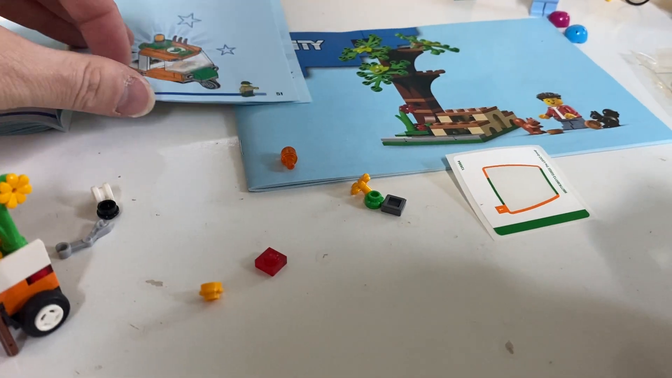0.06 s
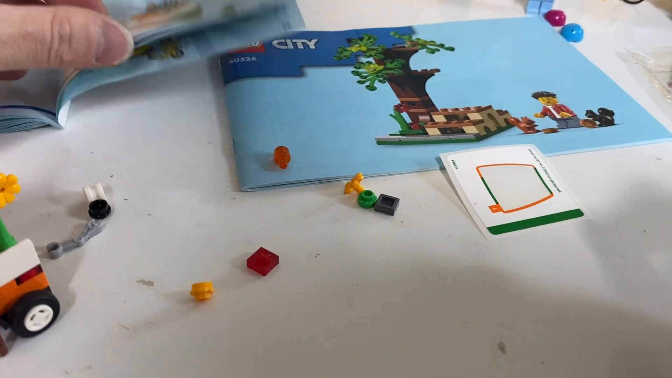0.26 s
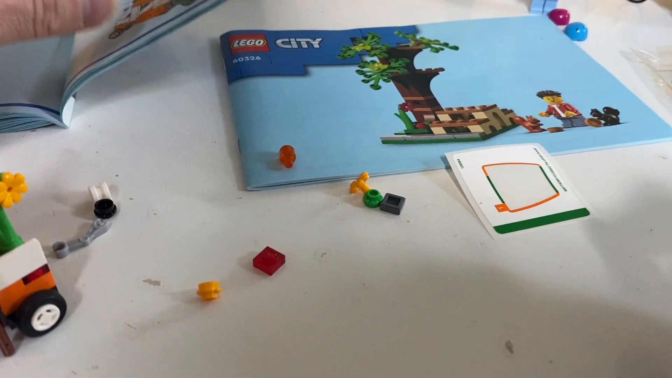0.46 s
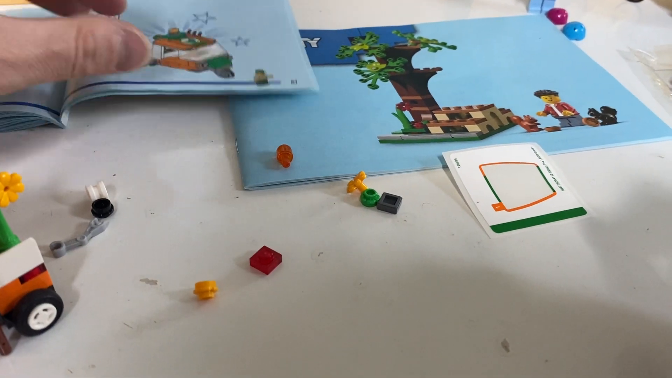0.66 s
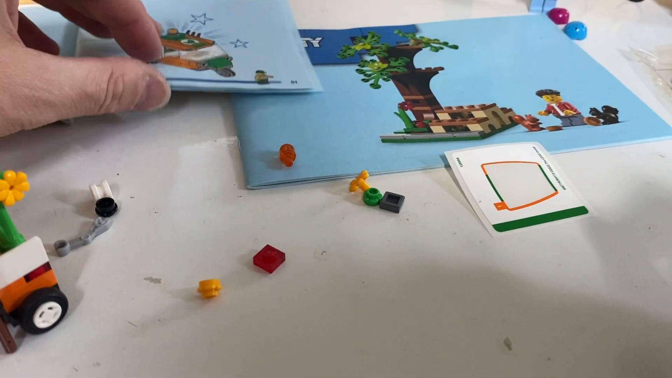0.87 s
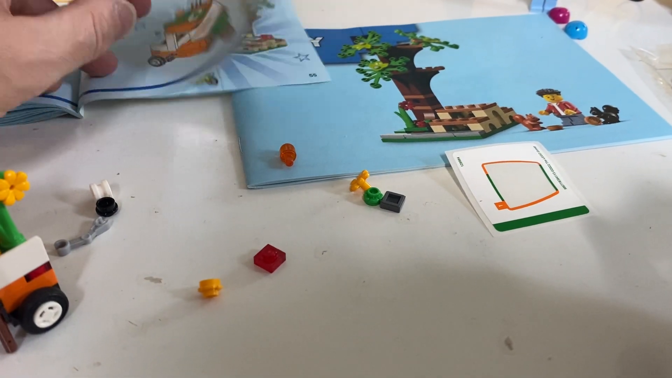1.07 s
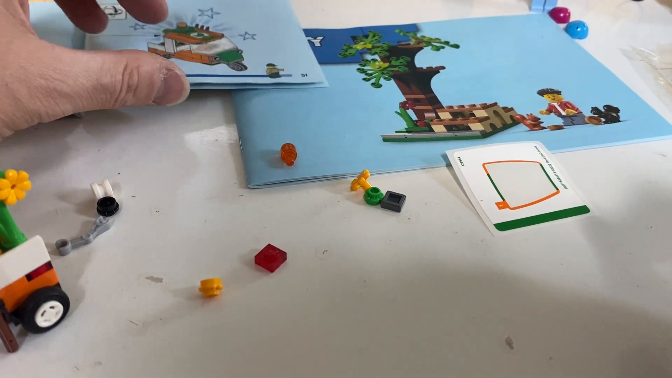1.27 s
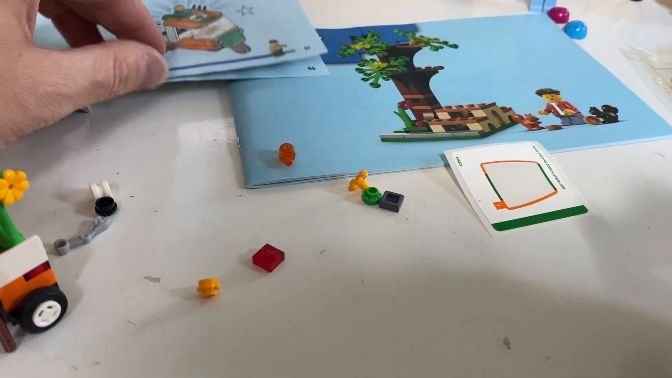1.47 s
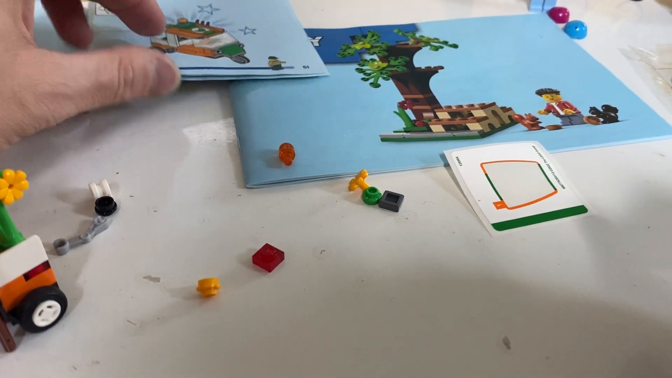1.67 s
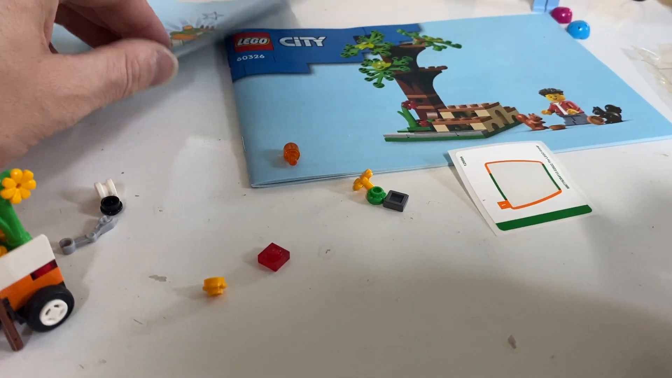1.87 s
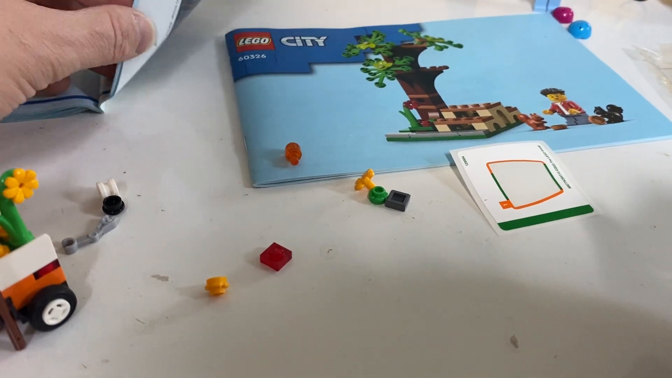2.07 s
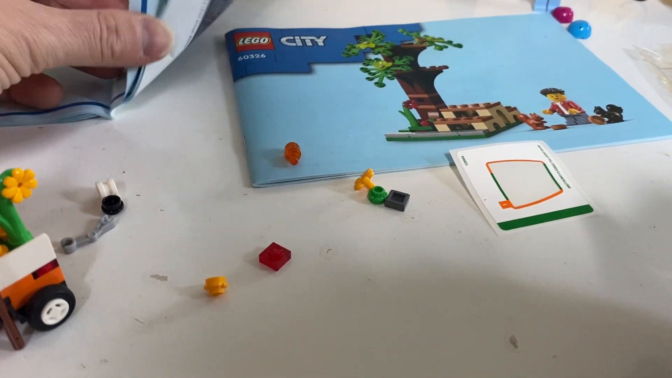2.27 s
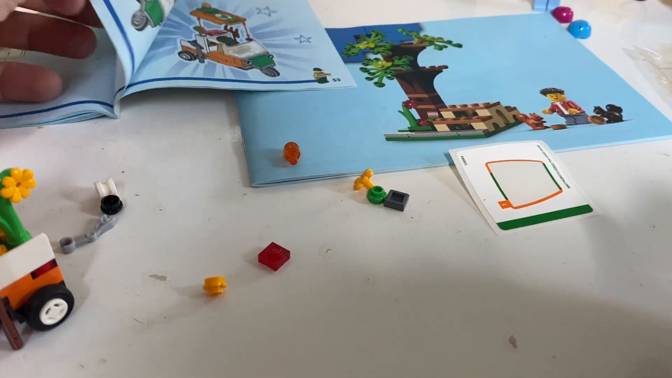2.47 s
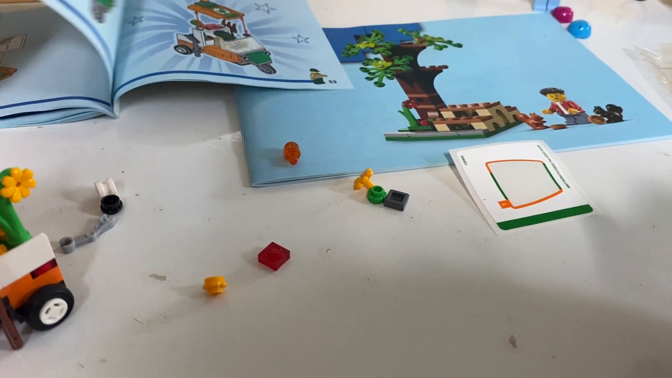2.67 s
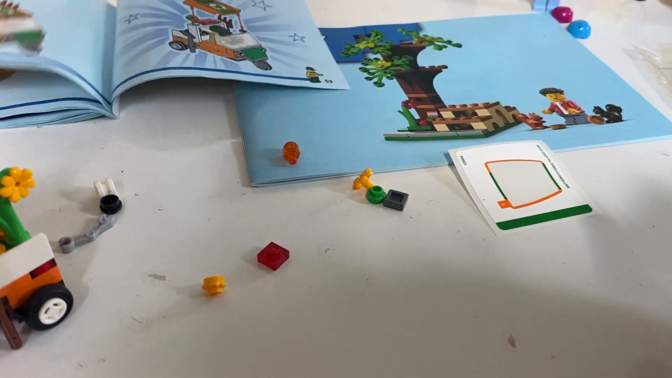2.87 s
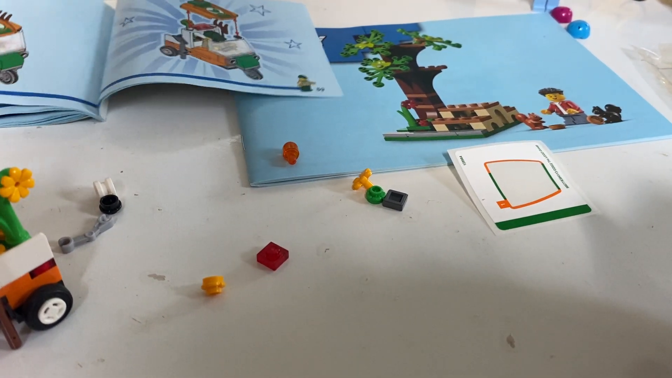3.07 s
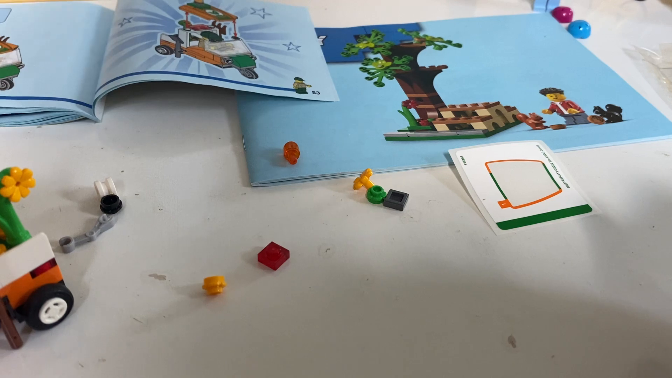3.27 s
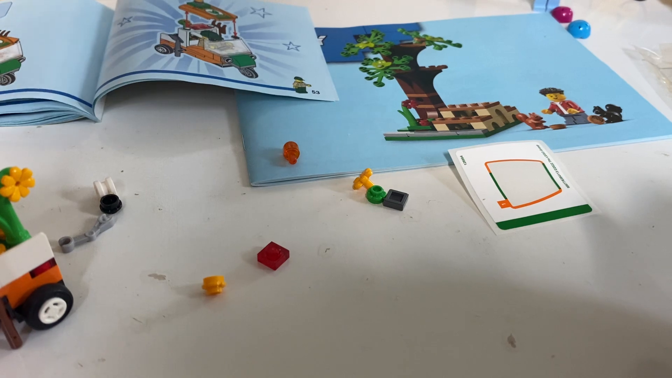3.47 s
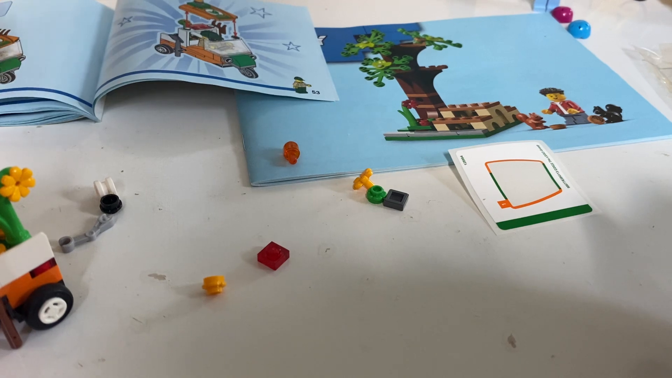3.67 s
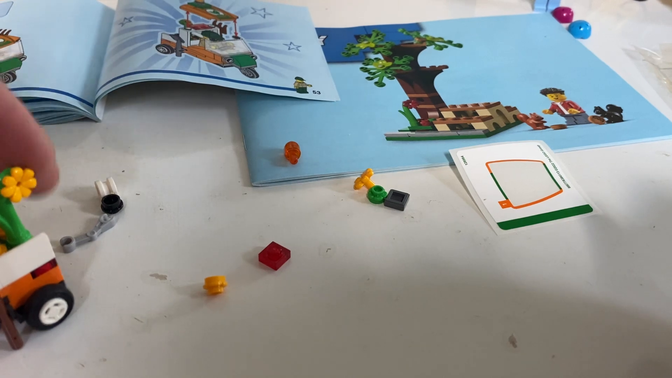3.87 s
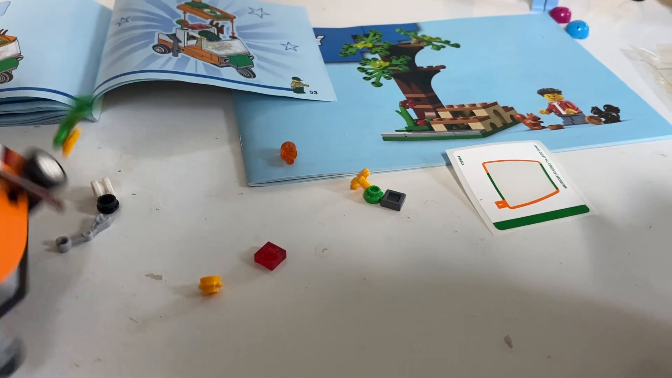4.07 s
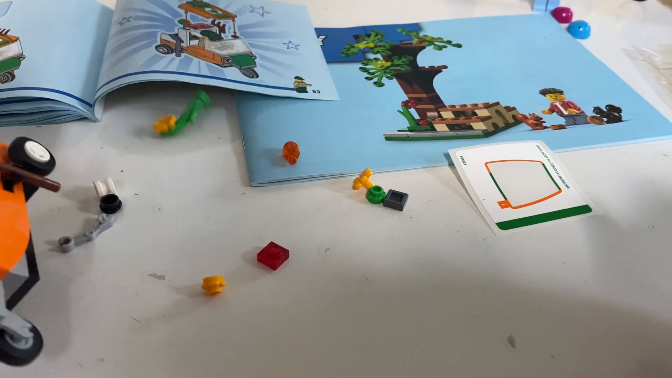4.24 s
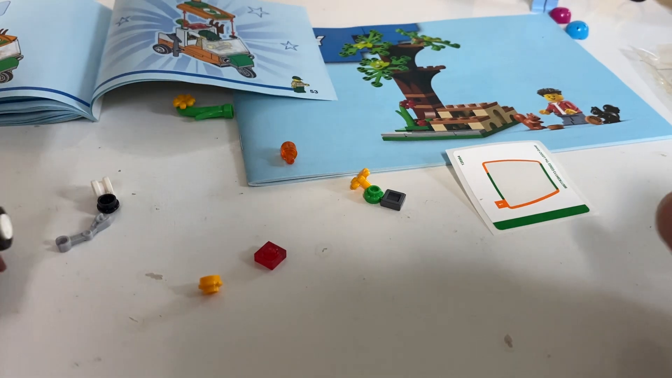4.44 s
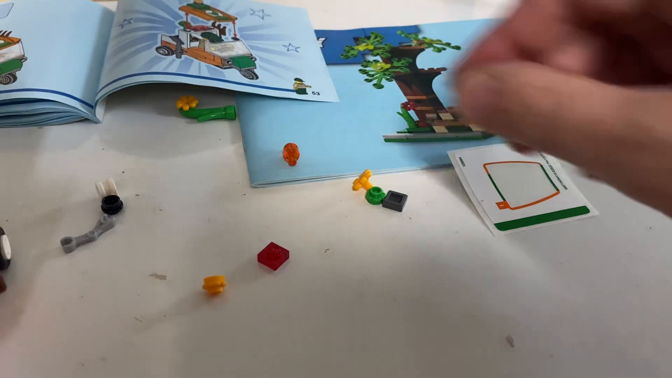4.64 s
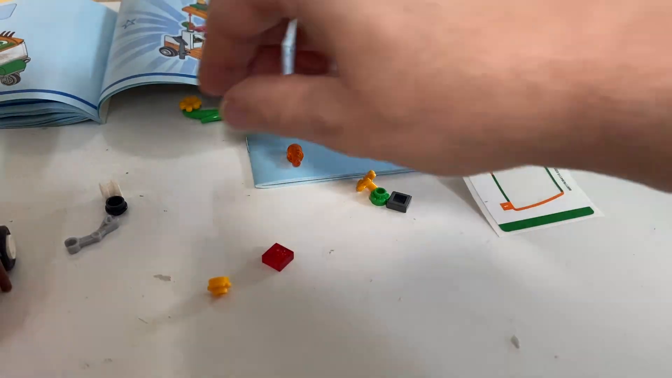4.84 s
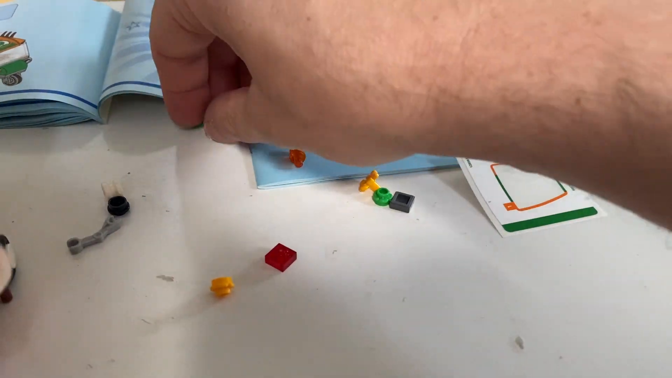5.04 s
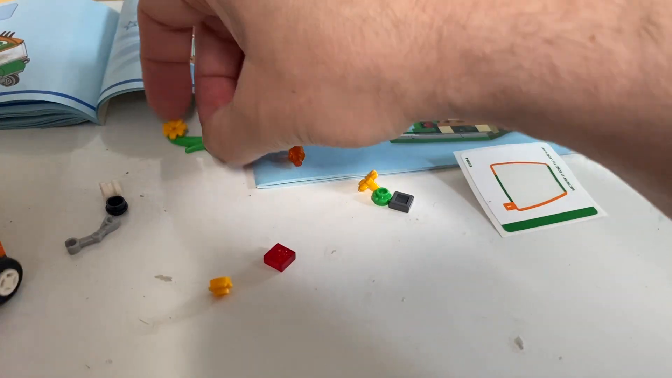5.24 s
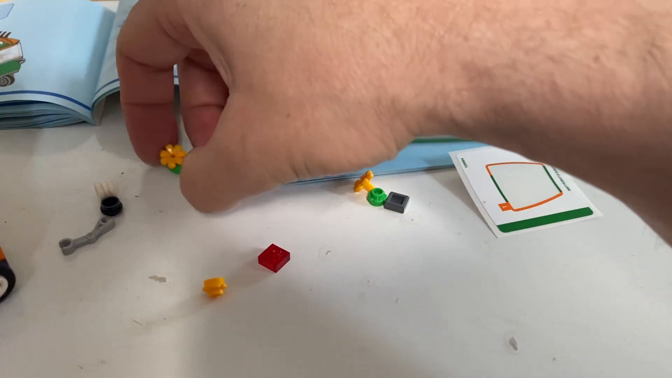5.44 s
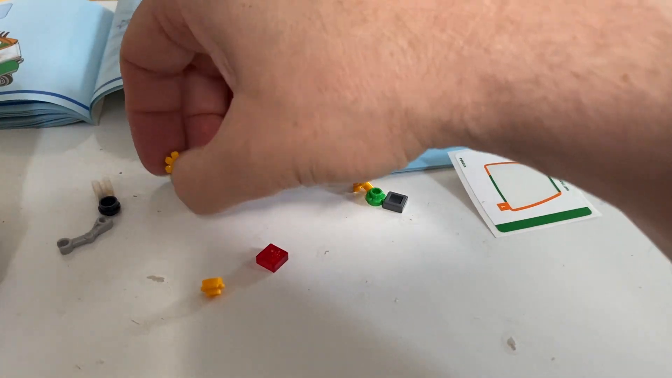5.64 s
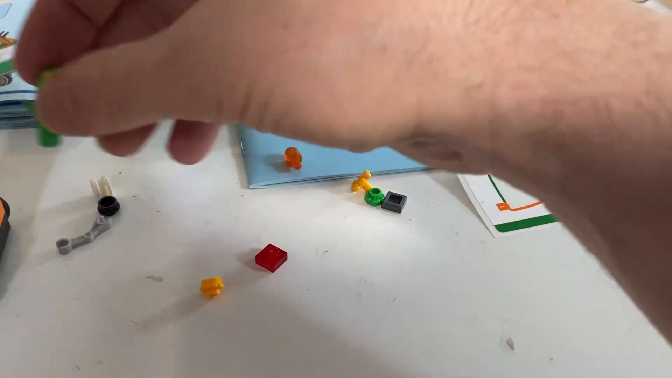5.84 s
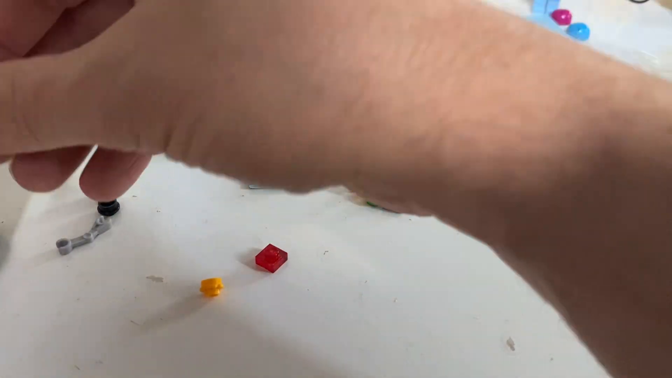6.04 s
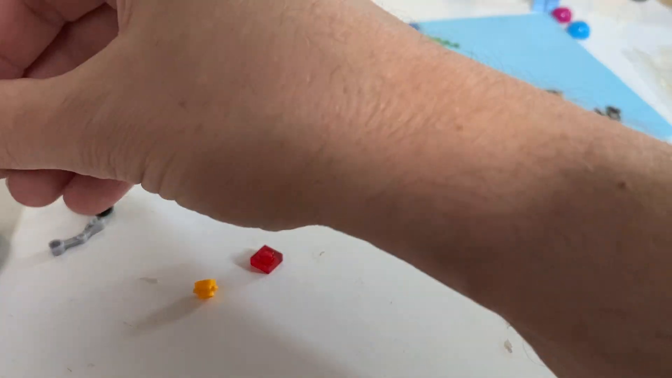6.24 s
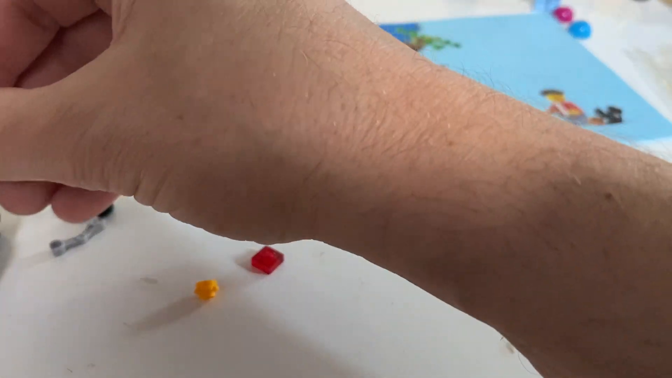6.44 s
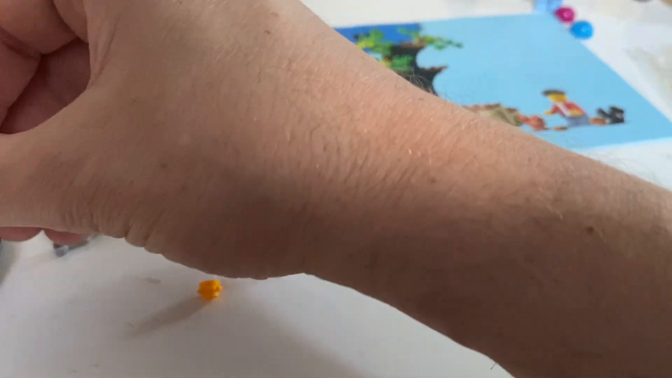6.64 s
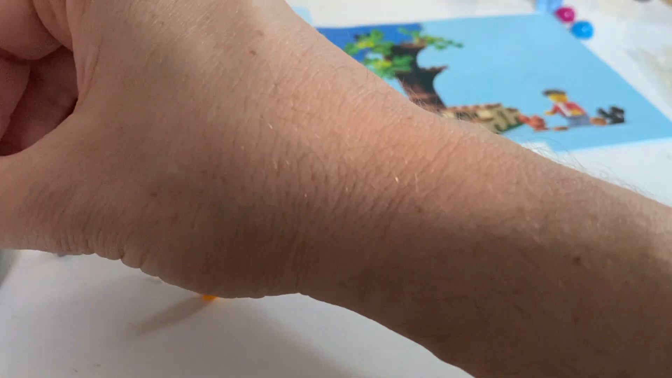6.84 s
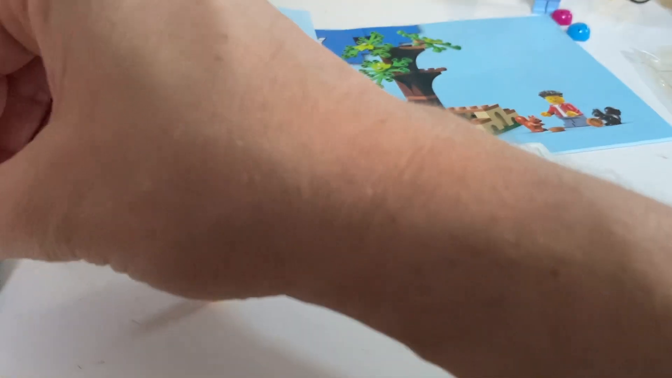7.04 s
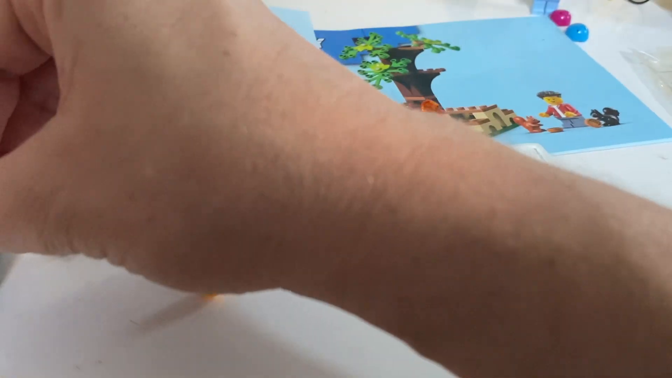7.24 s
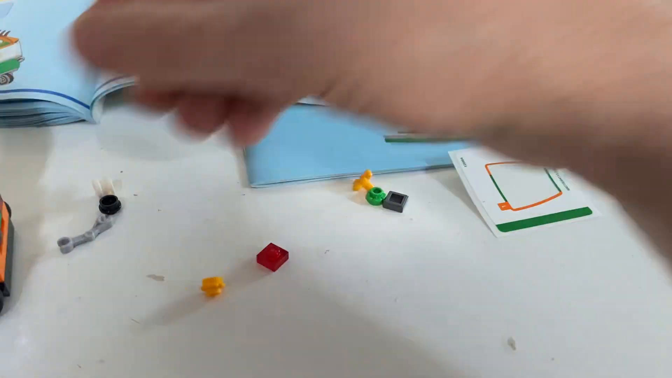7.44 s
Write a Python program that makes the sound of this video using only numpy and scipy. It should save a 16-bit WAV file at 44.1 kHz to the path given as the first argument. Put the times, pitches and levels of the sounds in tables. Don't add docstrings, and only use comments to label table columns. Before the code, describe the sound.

Faint paper sliding and thin snaps of a booklet being leafed through swell into a brisk page turn, then fade. A sudden hard double crack of plastic follows, with a hollow hit and rapid rattling bounces on the tabletop. Afterwards come quiet finger touches, a brief stuttering scrape, a click and a few muted knocks. Close, wide stereo, low room hush.

```python
import sys
import numpy as np
from scipy import signal
from scipy.fft import rfft, irfft, next_fast_len
from scipy.io import wavfile
from scipy.ndimage import map_coordinates

SR = 44100
rng = np.random.default_rng(int(sys.argv[2]) if len(sys.argv) > 2 else 0)


def materialize(psi):
    bounded = np.clip(np.atleast_2d(psi).T, -1, 1)
    quanta = np.round(bounded * 32767).astype(np.int16)
    wavfile.write(sys.argv[1], SR, quanta)


def volts_from_decibels(level):
    exponent = np.asarray(level, float) / 20
    return 10 ** exponent


N = 330880


def unit(x):
    return x / np.sqrt(np.mean(x ** 2) + 1e-20)


def peak(x):
    return x / np.abs(x).max(axis=1, keepdims=True)


def along(points, hz):
    f, v = np.transpose(points)
    return np.interp(np.log(hz + 1), np.log(f + 1), v)


def wobble(rate):
    return map_coordinates(rng.standard_normal(int(N * rate / SR) + 4), [np.arange(N) * rate / SR])


def filtered(x, response):
    n = x.shape[-1]
    m = next_fast_len(n + 4096)
    return irfft(rfft(x, m) * response(np.fft.rfftfreq(m, 1 / SR)), m)[..., :n]


def resonance(f, hz, width):
    return 1j * f * width / (hz ** 2 - f ** 2 + 1j * f * width)


def modes(table):
    return lambda f: sum((-1) ** k * volts_from_decibels(db) * resonance(f, hz, width)
                         for k, (hz, width, db) in enumerate(table))


def band(x, lo_hz, hi_hz):
    sos = signal.butter(2, [lo_hz, min(hi_hz, SR / 2.2)], "band", fs=SR, output="sos")
    return signal.sosfilt(sos, x)


def add_at(start_s, sounds):
    at = np.round(start_s * SR).astype(int) + np.arange(sounds.shape[1])
    return np.bincount(at.ravel(), sounds.ravel(), N + SR)[:N]


# pitch_hz, level_db
HUSH_COLOUR = [(100, -3), (250, -5), (500, -11), (1000, -25), (2000, -32.5), (4000, -38.5), (8000, -37.5),
               (15000, -41)]
# pitch_hz, level_db
RUMBLE_COLOUR = [(15, -53), (28, -23), (48, -1.5), (70, -1), (124, -9.5), (250, -16), (320, -45.5),
                 (550, -120)]
# time_s, level_db
RUMBLE_LEVEL = [(0.0, -57.5), (1.02, -51), (2.28, -60), (2.34, -46), (2.44, -60.5), (3.84, -66),
                (3.99, -42), (4.03, -46), (4.41, -66), (4.45, -51), (4.66, -52.5), (5.3, -52), (6.45, -61),
                (6.6, -53.5), (6.73, -65.5), (6.77, -43), (6.93, -56), (7.5, -58.5)]


def stillness():
    hush = filtered(rng.standard_normal((2, N)), lambda hz: volts_from_decibels(along(HUSH_COLOUR, hz)) * (hz > 100))
    rumble = filtered(rng.standard_normal((2, N)), lambda hz: volts_from_decibels(along(RUMBLE_COLOUR, hz)))
    rumble_db = np.interp(np.arange(N) / SR, *np.transpose(RUMBLE_LEVEL)) + 2.5 * wobble(6)
    return volts_from_decibels(-69.5) * unit(hush) * [[1], [1.6]] + volts_from_decibels(rumble_db) * unit(rumble)


def strokes(rows, release_db_per_s, body_db, air_db, dulls, linger):
    t = np.arange(0, N + 32, 32) / SR
    power = 0
    for start_s, length_s, first_db, last_db, bright_db in rows:
        held = first_db + (last_db - first_db) * np.clip((t - start_s) / length_s, 0, 1)
        held = held - 1097.5 * np.maximum(start_s - t, 0)
        fall = release_db_per_s * np.maximum(t - start_s - length_s, 0)
        hiss = held - fall
        body = held + body_db - dulls * bright_db - fall / linger
        air = held + air_db + bright_db - fall
        power = power + volts_from_decibels([hiss, body, air]) ** 2
    return np.repeat(np.sqrt(power), 32, axis=1)[:, :N]


# pitch_hz, width_hz, level_db
SHEET = [(1040, 1500, -4.5), (1400, 300, 2.5), (2700, 390, 2), (3687, 1500, -2), (4750, 2100, 1),
         (7300, 6600, -8)]
# pitch_hz, width_hz, level_db
TABLE_TOP = [(104, 44, -7.5), (206.5, 15, -2), (307, 60, -9.5)]
# start_s, length_s, first_db, last_db, brightness_db
PAPER_STROKES = [(0, .16, -67.5, -69.5, 5), (.17, 0.095, -71.5, -64, 2), (.3, 0.19, -64, -99, -6),
                 (.865, 0.18, -67, -55, 0), (1.04, 0.16, -65.5, -75, -6), (1.395, 0.062, -69.5, -53.5, 1.5),
                 (1.48, 0.24, -64.5, -92.5, 1.5), (1.7, 0.14, -79.5, -64.5, -7),
                 (1.82, 0.37, -57, -61.5, 1), (1.98, 0.35, -74, -62, -10.5), (2.1, .24, -56, -43.5, 3.5),
                 (2.36, 0.086, -46.5, -61, 0), (2.465, 0.08, -58.5, -47.5, 4.5),
                 (2.56, 0.103, -65, -68.5, 5), (2.68, 0.11, -57.5, -62, 3), (2.8, 0.13, -56.5, -61, -2),
                 (2.93, 0.23, -62.5, -65.5, 4.5), (3.17, 0.091, -83, -80, -3),
                 (3.295, 0.076, -65.5, -66, 5.5), (3.36, 0.11, -61.5, -74.5, -1.5)]
# start_s, length_s, first_db, last_db, brightness_db
HAND_STROKES = [(3.878, 0.031, -62, -56, 6), (3.985, 0.03, -40, -75, 2), (4.08, 0.074, -58.5, -55, -6),
                (4.17, 0.24, -45.5, -48.5, 0), (4.42, 0.1, -68, -54.5, -1), (4.55, 0.26, -59, -93, -3.5),
                (4.8, 0.061, -84, -87.5, -31.5), (4.9, 0.15, -66, -55.5, 2.5), (5.02, 0.13, -67, -53, 0.5),
                (5.218, 0.053, -38, -38.5, 3.5), (5.39, 0.018, -57, -45.5, -3.5),
                (5.43, 0.1, -50.5, -58, 0), (5.63, 0.068, -43.5, -58, -3), (5.74, 0.26, -71.5, -67, -6),
                (6.11, 0.071, -75, -73.5, -10), (6.175, 0.071, -67, -70.5, 0),
                (6.25, 0.032, -69.5, -62.5, -3), (6.45, 0.17, -63, -72.5, -3.5), (6.77, 0.13, -64, -61, -3),
                (6.93, 0.11, -64.5, -72.5, 1.5), (7.155, 0.13, -64, -70.5, 1.5),
                (7.27, 0.3, -65.5, -62.5, 1)]


def rubbing():
    paper = strokes(PAPER_STROKES, release_db_per_s=1092, body_db=-2.5, air_db=-4.5, dulls=1, linger=0.63)
    hands = strokes(HAND_STROKES, release_db_per_s=452.5, body_db=1, air_db=-11, dulls=0.55, linger=1.7)
    hiss_gain, body_gain, air_gain = paper + hands

    slipping = rng.random(N) < 300 * volts_from_decibels(7 * wobble(20)) / SR
    slips = unit(slipping * rng.standard_normal(N) * volts_from_decibels(2.2 * rng.standard_normal(N)))
    grip = wobble(90)

    def scrape(share):
        return rng.standard_normal(N) * volts_from_decibels(1.8 * grip + 1.5 * wobble(30)) + share * slips

    sheet = [volts_from_decibels(3.5 * wobble(12)) * filtered(scrape(0.6), modes([mode])) for mode in SHEET]
    hiss = unit(band(sum(sheet[2:]), 1584, 16000)) + 0.73 * unit(band(scrape(0.3), 1700, 6000))
    air = unit(band(scrape(0.59), 6300, 12000))
    body = unit(band(sum(sheet[:2]), 340, 1600)) + 1.4 * unit(band(scrape(0.87), 270, 1500))
    table = volts_from_decibels(-10 + 2.2 * wobble(7)) * unit(filtered(scrape(0.2), modes(TABLE_TOP)))
    direct = volts_from_decibels(-3.5) * hiss_gain * unit(hiss) + body_gain * unit(body)
    late = np.arange(N) - 0.00105 * SR * (1 + 0.05 * wobble(2))
    bounced = np.interp(late, np.arange(N), direct)
    return 0.81 * (direct + 0.44 * bounced) + air_gain * air + body_gain * table


# start_s, peak_db, pitch_hz, swell_ms
PUFFS = [(0.021, -52.5, 2170, 0.61), (.13, -53.5, 4000, 1.6), (0.327, -49, 1470, 1.6),
         (0.393, -64, 2200, 1.3), (.897, -52, 6000, 1), (0.951, -55, 2700, 1.8), (.991, -52, 2300, 1.7),
         (1.007, -52, 2700, 2), (1.014, -46, 2000, 2), (1.039, -55, 3700, 1.5), (1.046, -47, 4430, 2.6),
         (1.102, -35.5, 1700, 1.9), (1.13, -64, 2500, 8), (1.166, -52.5, 1680, 5.3), (1.386, -68, 3000, 2),
         (1.795, -57.5, 4500, 1.6), (2.17, -41, 1300, 3.4), (2.209, -44, 1600, 4),
         (2.237, -34.5, 1100, 1.5), (2.29, -43.5, 3900, 1.8), (2.484, -54, 1000, 1.8),
         (2.596, -51, 3900, 2.9), (2.696, -53, 2540, 2.3), (2.698, -44, 1140, 2.7),
         (2.742, -50.5, 905, 1.6), (2.783, -50.5, 3070, 3), (2.834, -44, 3500, 1.5),
         (2.836, -41.5, 1200, 1.9), (2.866, -40.5, 1330, 1.8), (3.012, -51, 1990, 1.4),
         (3.277, -59, 2240, 2.7), (3.306, -71, 2220, 3), (3.345, -49, 4800, 4.5),
         (3.959, -43, 3470, 4.2), (3.983, -23.5, 3800, 1.5), (3.997, -28.5, 3680, 5.5),
           (4.05, -25, 7300, 2.4), (4.05, -23, 3400, 1.5), (4.019, -26.5, 2800, 1.6),
           (3.968, -19.5, 11500, 1.1), (4.051, -36, 1300, 2), (4.152, -14, 804, 1.24),
           (4.1524, -10.5, 1310, 1), (4.2248, -20.5, 1320, 2), (4.434, -31.5, 533, 8.5),
           (4.414, -45.5, 3000, 2.2), (4.66, -42.5, 1114, 3.6), (4.941, -44, 2500, 3.3),
           (4.966, -38, 1400, 2.4), (5.005, -45.5, 1000, 3.7), (5.041, -45.5, 3620, 1.9),
           (5.042, -43.5, 795, 1.4), (5.0643, -53, 1900, 1.5), (5.113, -56, 1000, 2.7),
           (5.135, -53.5, 4800, 5), (5.2118, -24, 746, 1.04), (5.2302, -20.5, 790, 0.53),
           (5.253, -23.5, 680, .7), (5.184, -45.5, 2600, 1.7), (5.298, -50.5, 2200, 1.5),
           (5.314, -46, 2800, 3.2), (5.424, -38, 1520, 4.2), (5.462, -47.5, 2170, 1.5),
           (5.485, -49, 890, 8.4), (5.498, -51, 2500, 2.2), (5.566, -51, 5240, 2.9),
           (5.647, -36.5, 4300, 2), (5.65, -33.5, 798, 5), (5.685, -35.5, 1650, 4.1), (5.687, -45, 3240, 2),
           (5.746, -33.5, 927, 1.5), (6.83, -52, 5380, 3.3), (6.865, -53.5, 5070, 4.2),
           (7.047, -42, 714, 2.6), (7.336, -45, 713, 2.1)]


def touches():
    start_s, peak_db, hz, swell_ms = np.transpose(PUFFS)[:, :, None]
    u = np.arange(SR // 12) / SR / (swell_ms / 1000)
    noise = rng.standard_normal(u.shape) * u * np.exp(-u)
    puff = filtered(noise, lambda f: resonance(f, hz, 0.58 * hz) ** 2)
    return add_at(start_s, volts_from_decibels(peak_db) * peak(puff))


# pitch_hz, width_hz, level_db
TOY_BODY = [(800, 170, 0), (560, 150, -5), (1310, 180, -9), (1000, 160, -4), (400, 120, -8)]


def contacts(rows, crack_s, ring_s, body_s, table_s, ring_db, low_hz, edge_db):
    start_s, peak_db, hz, body_db, air_db, *table_db = np.transpose(rows)[:, :, None]
    t = np.arange(SR // 12) / SR
    chance = rng.standard_normal((len(rows), 4, len(t)))

    def dying(t60):
        return volts_from_decibels(-60 * t / t60) * (1 - np.exp(-t / 0.0013))

    hold = np.exp(-(t / crack_s) ** 4)
    chatter = chance[:, 0] * (hold + 0.16 * dying(6 * crack_s)) * (1 - np.exp(-t / 0.00035))
    edge = volts_from_decibels(np.minimum(edge_db + 0.4 * air_db, 3))
    crack = band(chatter, low_hz, 5000) + edge * band(chatter, 5400, 9400)
    crack = band(crack, low_hz, 9000)
    ring = filtered(chance[:, 3] * dying(ring_s), lambda f: resonance(f, hz, 0.13 * hz))
    air = band(chatter, 7000, 13800)
    body = filtered(chance[:, 1] * (dying(body_s) + 1.2 * hold), modes(TOY_BODY))
    body = band(body, 550, 2800)
    table = filtered(chance[:, 2] * dying(table_s), modes(TABLE_TOP))
    thud_db = table_db[0] if table_db else body_db - 4

    hit = peak(peak(crack) + volts_from_decibels(ring_db) * peak(ring))
    hit += volts_from_decibels(np.minimum(air_db + 7, 3)) * peak(air)
    hit += volts_from_decibels(body_db + 2) * peak(body)
    hit += volts_from_decibels(thud_db + 2) * peak(table)
    return add_at(start_s, volts_from_decibels(peak_db + 2.5) * hit)


# start_s, peak_db, pitch_hz,
# body_db, air_db (both relative)
SNAPS = [(0.167, -48, 1900, -36, 0), (0.2133, -50, 2250, -30, -1.5), (0.2382, -34.5, 3470, -18.5, -3.5),
         (0.2507, -47, 6230, -34, -20), (0.2678, -36, 6350, -29, -12), (0.2742, -33, 6170, -23.5, -25),
         (0.9517, -57, 2770, -8, -29), (1.025, -34, 6700, -16.5, -9.5), (1.0295, -39, 4030, -16.5, -9),
         (1.1046, -43.5, 4170, -3, -36), (1.4161, -31.5, 3940, -14, -15), (1.4535, -45, 6070, -13, -32),
         (1.718, -58, 2140, -5, -14), (1.8213, -45.5, 1740, -3.5, -3), (1.8959, -37.5, 2430, -10.5, -3),
         (2.063, -45, 6200, -20, -14), (2.296, -34.5, 1610, -17, -17), (2.3269, -29, 6000, -7, -21),
        (2.337, -26.5, 1710, -19, -14), (2.346, -35.5, 2270, -10.5, -24), (2.3723, -39, 3850, -7, -9),
        (2.4704, -44, 6850, -12, -14), (2.6878, -44, 3400, -9.5, -26), (2.794, -45, 2440, -23, -23),
        (2.8081, -46, 2230, -9, -12), (2.861, -35, 2600, -29, -18), (2.898, -48, 2200, -25, -25.5),
        (2.9174, -38.5, 5300, -19, -32.5), (2.9572, -59.5, 4850, 13.5, -14), (3.0599, -47, 2610, -3.5, -7),
        (3.352, -42.5, 6740, -31, -16), (3.4043, -48.5, 5030, -7, -27), (3.417, -45, 2470, -11.5, -33),
        (4.9484, -34.5, 1960, -9.5, -23.5), (4.9945, -37, 1710, -7, -13)]


def page_snaps():
    return contacts(SNAPS, crack_s=0.0036, ring_s=0.014, body_s=0.038, table_s=0.0455,
                    ring_db=-0.5, low_hz=1400, edge_db=6.5)


# start_s, length_s, first_hz, last_hz, level_db
SINGING = [(1.038, .07, 4020, 4370, -67), (2, 0.13, 1400, 1100, -64), (2.03, .12, 1750, 1650, -65),
           (2.482, .06, 4750, 4700, -61), (2.16, .16, 1000, 1478, -62), (2.576, 0.087, 4660, 4720, -74.5),
           (2.68, 0.091, 5800, 5400, -72), (2.794, 0.088, 2550, 2600, -72), (2.899, .26, 4890, 4920, -75),
           (2.995, 0.17, 2630, 2400, -76), (3.18, .08, 5240, 5180, -79.5), (3.279, 0.14, 2290, 2320, -72),
           (3.283, .06, 5250, 5020, -76), (5.31, 0.058, 2800, 2620, -74), (6.12, 0.078, 1008, 907, -67.5),
           (6.61, 0.061, 2280, 2150, -80), (6.86, 0.12, 998, 1100, -67), (7.155, 0.1, 1095, 989, -62.5)]


def singing():
    width_hz, edge_s = 550, 0.015
    out, t = np.zeros(N), np.arange(SR // 3) / SR
    for start_s, length_s, first_hz, last_hz, db in SINGING:
        noise = rng.standard_normal((2, len(t)))
        blur = filtered(noise, lambda f: 1 / (1 + (2 * f / width_hz) ** 2))
        turn = 2 * np.pi * np.cumsum(first_hz + (last_hz - first_hz) * t / length_s) / SR
        tone = unit(blur[0] * np.cos(turn) + blur[1] * np.sin(turn))
        edges = np.clip(t / edge_s, 0, 1) * np.exp(-np.maximum(t - length_s, 0) / edge_s)
        out[round(start_s * SR):][:len(t)] += volts_from_decibels(db + 3.4 * wobble(28)[:len(t)]) * edges * tone
    return out


# start_s, pitch_hz,
# level_db, t60_s
RINGS = [(1.103, 1680, -31, .04), (1.103, 2190, -42, .05), (1.112, 1690, -53, .2), (3.978, 3900, -33, .15),
         (3.979, 2300, -39, .1), (4.055, 3070, -44, .1), (4.079, 1587, -43, .59), (3.976, 207, -44, .3),
         (4.156, 208, -51, .8), (4.29, 208, -55, .8), (4.97, 208, -56, 1), (5.2, 208, -46, .6),
         (5.235, 209, -35, .3), (5.25, 307, -38, .18), (4.82, 2500, -70, .15), (4.964, 3130, -43, .05),
         (5.39, 207, -46, .7), (5.74, 208, -55, .5), (6.249, 4150, -56, .25), (6.25, 2050, -56, .22),
         (6.252, 1350, -60, .2), (6.454, 1324, -49, .2), (6.455, 4000, -64, .15), (6.47, 2640, -61, .2),
         (6.955, 5450, -67, .2), (7.052, 525, -47, .1), (7.2, 4700, -64, .2), (7.216, 2630, -53.5, .17),
         (7.342, 566, -45, .14)]


def rings():
    out, t = np.zeros(N + SR), np.arange(SR // 2) / SR
    for start_s, hz, db, t60_s in RINGS:
        blur = 0.03 if hz < 400 else 0.06
        drift = np.cumsum(rng.standard_normal(len(t))) * np.sqrt(2 * np.pi * blur * hz / SR)
        tone = np.sqrt(2) * np.sin(2 * np.pi * hz * t + drift) * volts_from_decibels(2 * wobble(hz / 20)[:len(t)])
        out[round(start_s * SR):][:len(t)] += volts_from_decibels(db - 60 * t / t60_s) * (1 - np.exp(-t / 0.0017)) * tone
    return out[:N]


def on_table(rows, thud_db, share):
    return [(*row, thud_db + share * row[3]) for row in rows]


# start_s, peak_db, pitch_hz, body_db, air_db
BREAK = [
    (3.8808, -39, 2346, -9, -23.5),
    (3.908, -36.5, 2257, -1.5, -15),
    (3.967, -19, 5996, -21.5, -3),
    (3.9722, -4, 4100, -34.5, -13.5),
    (3.9742, -5.5, 6340, -35.5, -15.5),
    (3.9852, -20, 3910, -19, -9),
    (3.9928, -24, 2700, -30.5, -9.5),
    (4.0187, -31.5, 2814, -30.5, -10),
    (4.0298, -27.5, 4046, -26.5, -25),
    (4.0498, -23.5, 3090, -23.5, -17),
]
# start_s, peak_db, pitch_hz, body_db, air_db
LOOSE = [(4.1523, -8, 2160, -18, -21.5), (4.1535, -11, 4100, -11, -50), (4.2073, -38, 1966, -28.5, -20),
         (4.2247, -10, 7900, -17, 1), (4.2489, -16.5, 1720, -16.5, -11), (4.2545, -19, 4600, -14, -14),
         (4.2689, -25.5, 2180, -9, -28), (4.2965, -29.5, 1740, -8.5, -19), (4.3261, -27, 2020, -10, -16),
         (4.336, -17, 5000, -11.5, -7), (4.3521, -26.5, 5200, -13, -24), (4.3661, -28.5, 1792, -39, 1),
         (4.3799, -29.5, 2130, -14, -17), (4.4014, -36, 2024, -13.5, -25),
         (5.6105, -45.5, 2795, -18.5, -8.5), (5.6251, -20, 4200, -0.5, -6.5),
         (5.6393, -32.5, 2810, -7.5, -5)]
# start_s, peak_db, pitch_hz, body_db, air_db
FUMBLE = [(4.4308, -43.5, 2740, 6.5, -30), (4.4793, -40, 1520, 3, -14), (4.5122, -28.5, 2750, -6.5, -7),
          (4.5205, -24.5, 5050, -7.5, -28), (4.558, -35, 3070, -6.5, -15.5),
          (4.6592, -40.5, 2900, -6.5, -21), (4.8136, -65, 1610, 12.5, -36), (5.0954, -43.5, 3900, -1, -19),
          (5.1249, -43.5, 3150, -4, -24), (5.1642, -42, 3270, -8.5, -26), (5.1756, -36.5, 3140, -4, -6),
          (5.1907, -42, 2220, -5, -1), (5.3789, -37, 1700, 0.5, -11.5), (5.4046, -26.5, 1950, -12, -13.5),
          (5.439, -33, 2170, -16, -12.5), (5.4868, -40.5, 2800, -0.5, -33.5), (5.7427, -37, 1800, -3.5, -3)]
# start_s, peak_db, body_db
DRAG = [
    (5.2203, -28.5, -4.5),
    (5.2307, -24, -9),
    (5.244, -30, -7),
    (5.2528, -33, -12),
    (5.263, -27, -4),
    (5.2724, -27.5, -3),
    (5.28, -27, -13),
]
# start_s, peak_db, pitch_hz, body_db
KNOCKS = [
    (5.9352, -34, 2920, -10.5),
    (6.5867, -50.5, 1573, -3),
    (6.76, -29, 2700, -20),
    (6.774, -38, 1430, -27.5),
    (6.85, -44, 1490, -5),
    (7.0499, -58, 2130, 12),
    (7.3379, -59, 1520, 17.5),
    (7.3539, -44.5, 4100, -1.5),
    (7.4078, -42.5, 2620, -1),
    (7.439, -47.5, 1810, -1),
]


def bricks():
    drag = [(start_s, db, 4100, body_db, -29.5) for start_s, db, body_db in DRAG]
    knocks = [(*row, -12.5) for row in KNOCKS]
    handled = (on_table(LOOSE, thud_db=-20.5, share=1) + on_table(FUMBLE, thud_db=-2.5, share=0.91)
               + on_table(drag, thud_db=-17, share=0) + on_table(knocks, thud_db=1.5, share=0.71))
    cracks = contacts(on_table(BREAK, thud_db=-2.5, share=0.91), crack_s=0.0011, ring_s=0.0093,
                      body_s=0.028, table_s=0.068, ring_db=-11, low_hz=1900, edge_db=9)
    return cracks + contacts(handled, crack_s=0.0027, ring_s=0.016, body_s=0.031, table_s=0.0626,
                             ring_db=-4, low_hz=1200, edge_db=10)


# pitch_hz, t60_s
ROOM_DECAY = [(200, 0.4), (1000, 0.12), (4000, 0.15), (12000, 0.11)]


def room(x):
    hz, t, z = signal.stft(rng.standard_normal((2, SR // 2)), SR, nperseg=256)
    fading = z * volts_from_decibels(-60 * t / along(ROOM_DECAY, hz)[:, None])
    tail = signal.istft(fading, SR, nperseg=256)[1]
    tail = tail / np.linalg.norm(tail[0])
    return signal.fftconvolve(np.pad(x, (150, 0))[None], tail, axes=1)[:, :N]


# pitch_hz, level_db
APART = [(60, -20), (250, -11), (700, -2), (2000, -1), (5500, -4), (6600, -18), (15000, -18)]


def scene():
    top_hz = 15850
    hits = page_snaps() + bricks() + touches()
    rub, ring = rubbing() + singing(), rings()
    tails = room(volts_from_decibels(-15) * hits + volts_from_decibels(-12.5) * rub + volts_from_decibels(-10) * ring) + stillness()
    scattered = room(volts_from_decibels(-3) * rub + volts_from_decibels(-7) * hits)[0]
    shared = filtered(hits, lambda hz: 1 / (1 + (hz / 15950) ** 60))
    shared = shared + filtered(rub + ring + tails[0], lambda hz: hz < top_hz)
    unshared = filtered(tails[1] + scattered, lambda hz: volts_from_decibels(along(APART, hz)) * (hz < top_hz))
    return np.array([shared + unshared, shared - unshared])


def low_pass(x):
    return signal.sosfilt(signal.butter(12, 16970, fs=SR, output="sos"), x)


# pitch_hz, lead_rad
LEAD = [(0, 0), (400, .3), (1300, 2.3), (1800, 2), (2300, .1), (4500, .3), (6600, 0)]
# pitch_hz, level_db
LEAN = [(100, .3), (400, 1.5), (850, 6), (1300, 2), (2700, 6), (3800, 1.5), (5200, 5), (6600, 0)]


def record(dry):
    split_hz, lag_samples = 6900, 10.4

    def lead(hz):
        lag = 2 * np.pi * lag_samples * np.maximum(hz - split_hz, 0) / SR
        return np.interp(hz, *np.transpose(LEAD)) - lag

    half = np.array([[0.5], [-0.5]])
    wide = filtered(dry, lambda hz: volts_from_decibels(half * along(LEAN, hz)) * np.exp(1j * half * lead(hz)))
    return low_pass(wide)


dry = scene()
out = record(dry)
materialize(out)
```